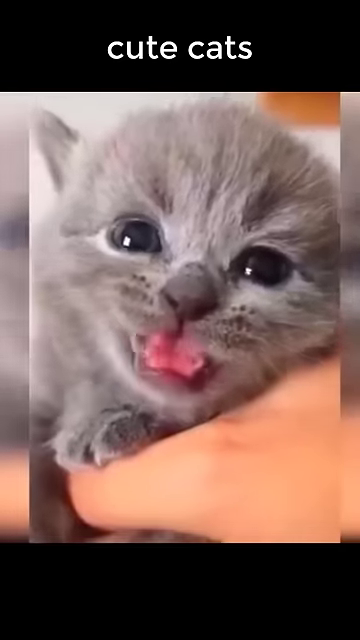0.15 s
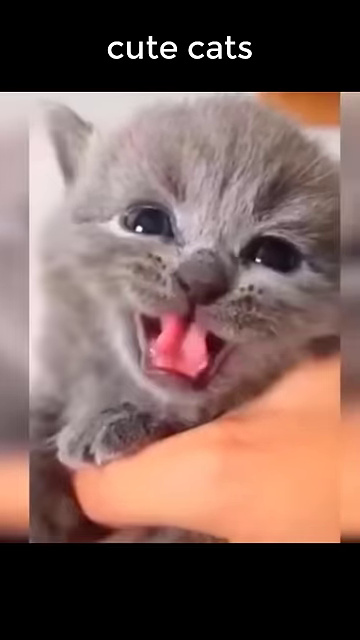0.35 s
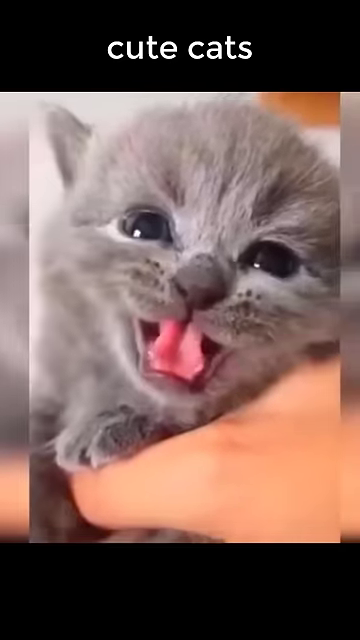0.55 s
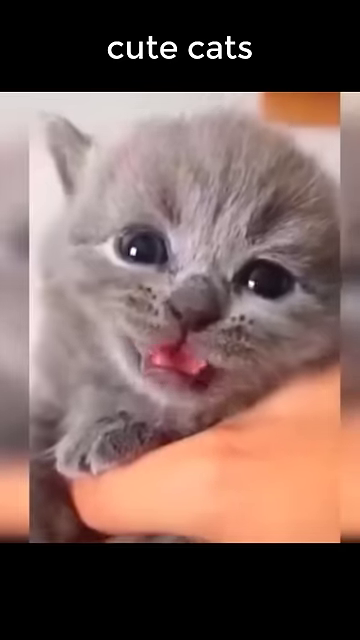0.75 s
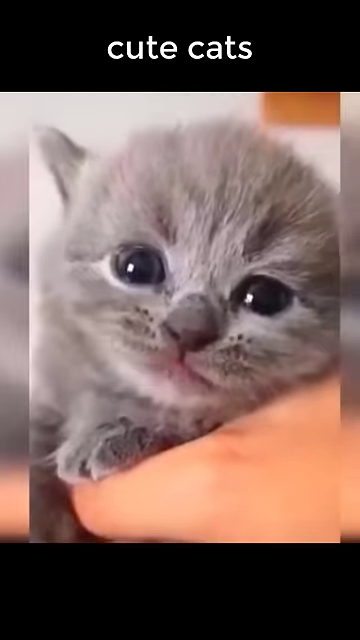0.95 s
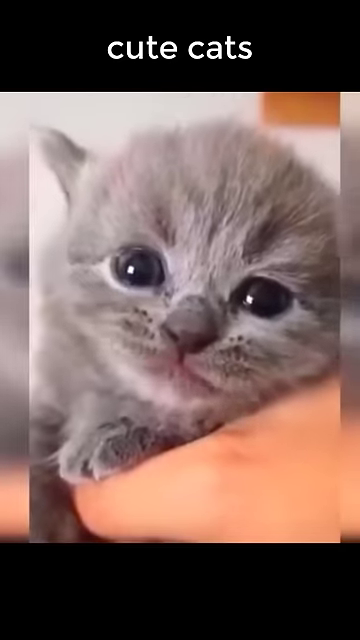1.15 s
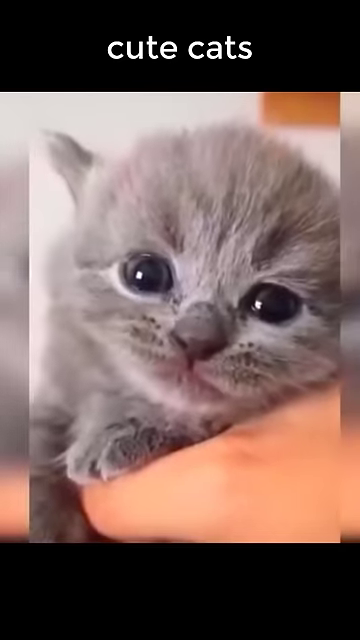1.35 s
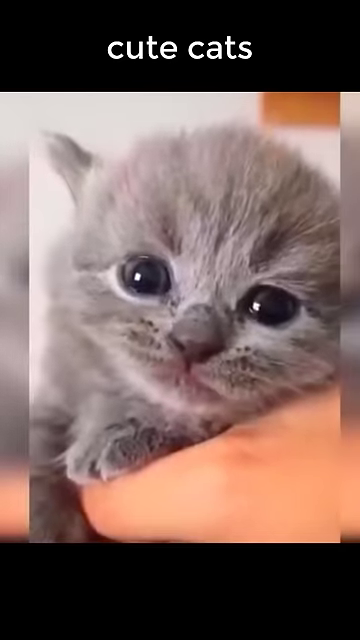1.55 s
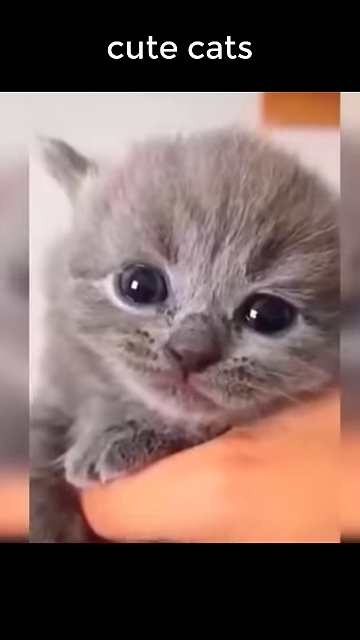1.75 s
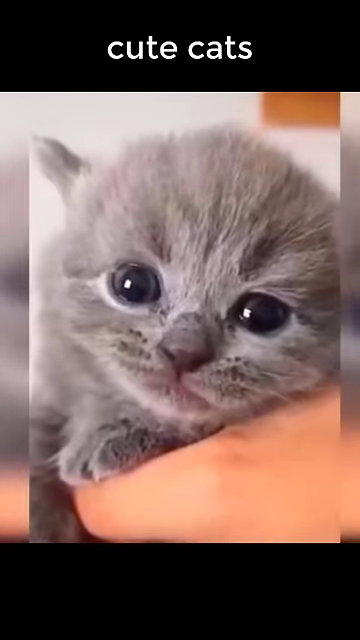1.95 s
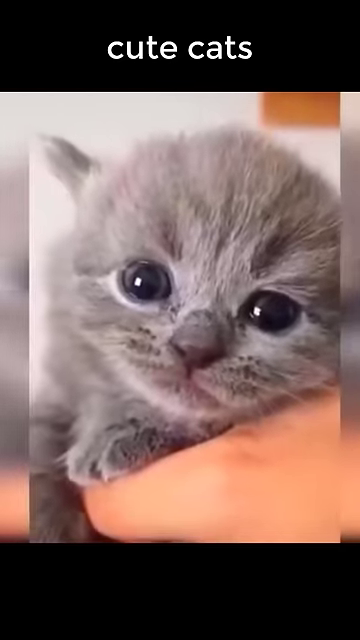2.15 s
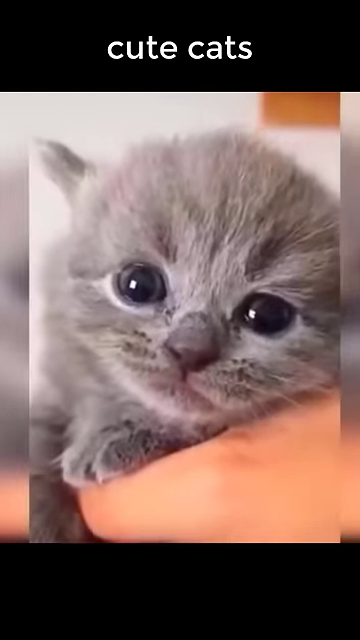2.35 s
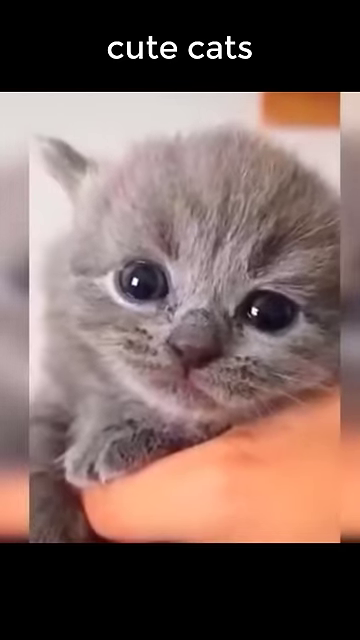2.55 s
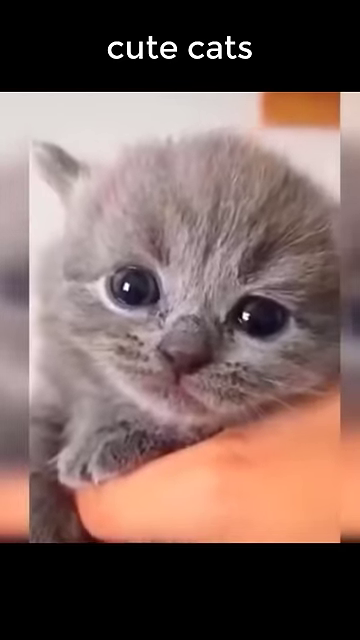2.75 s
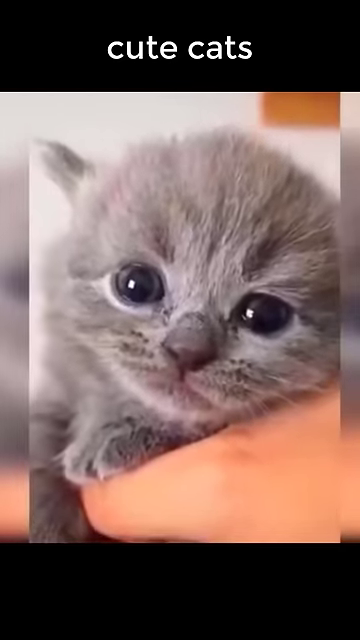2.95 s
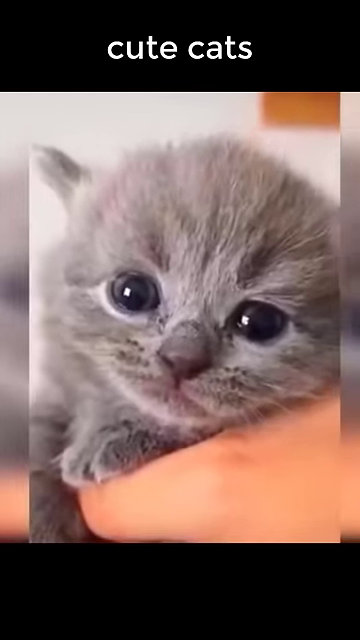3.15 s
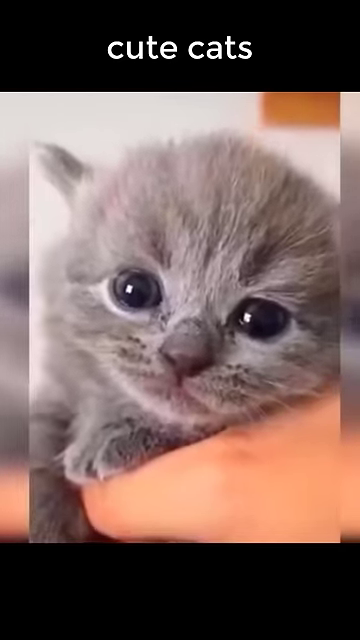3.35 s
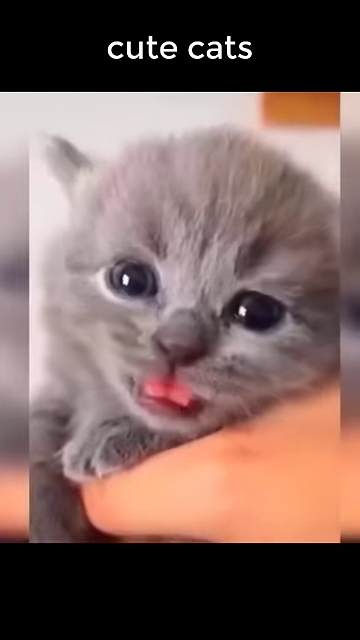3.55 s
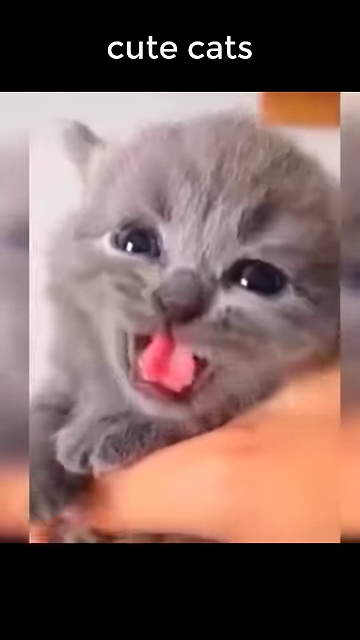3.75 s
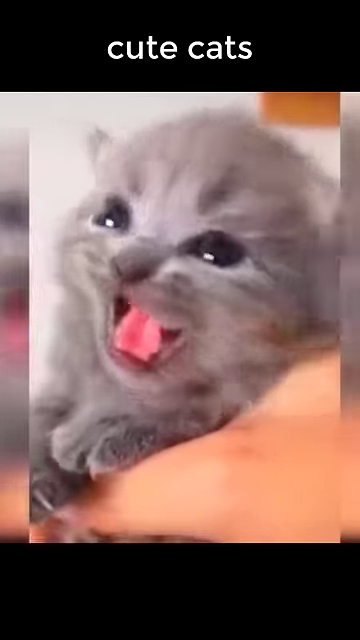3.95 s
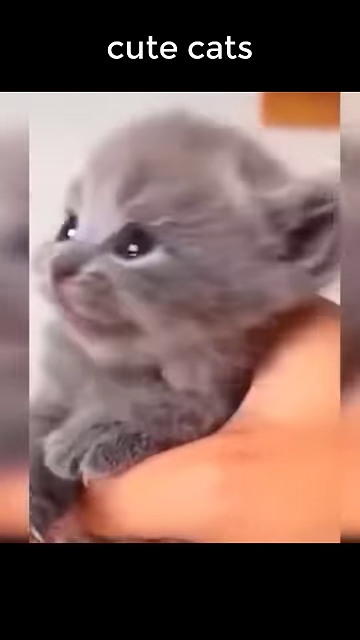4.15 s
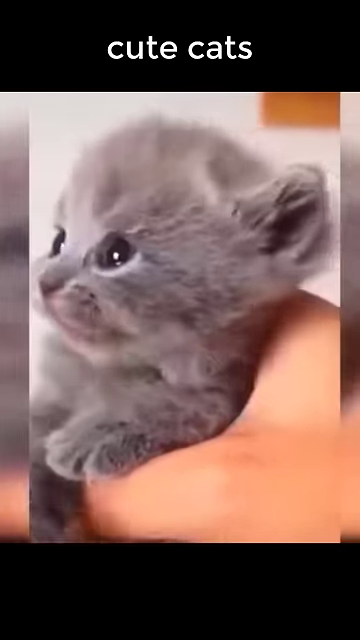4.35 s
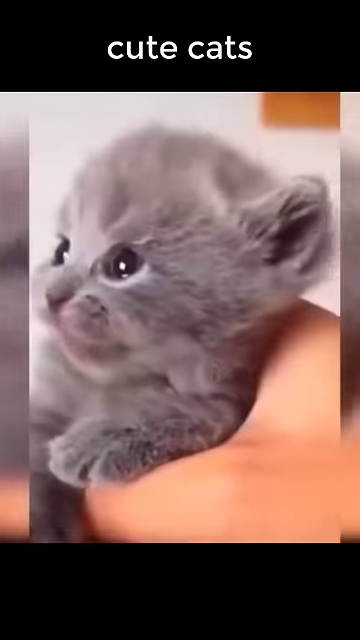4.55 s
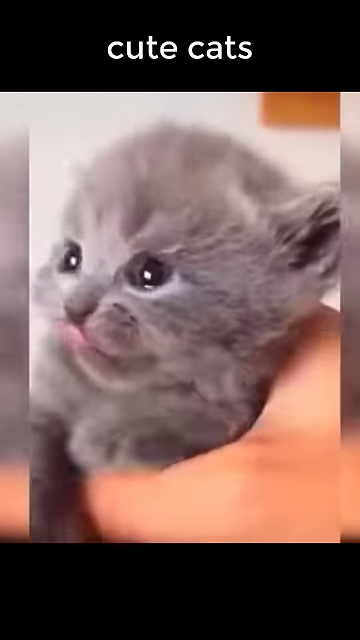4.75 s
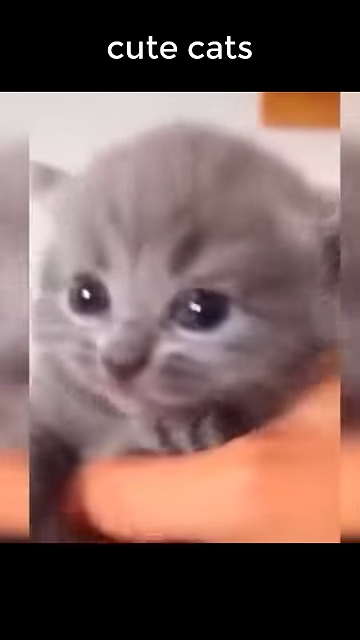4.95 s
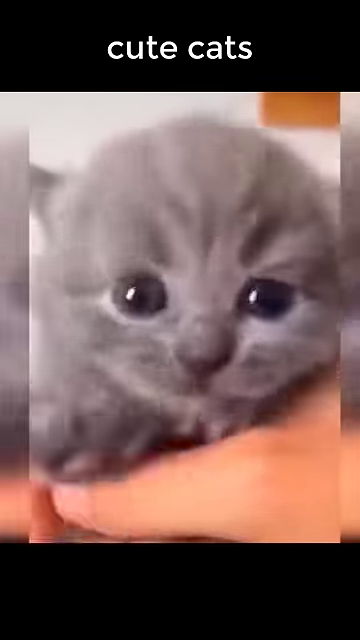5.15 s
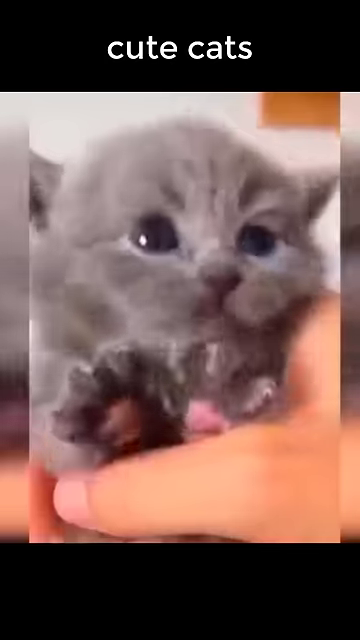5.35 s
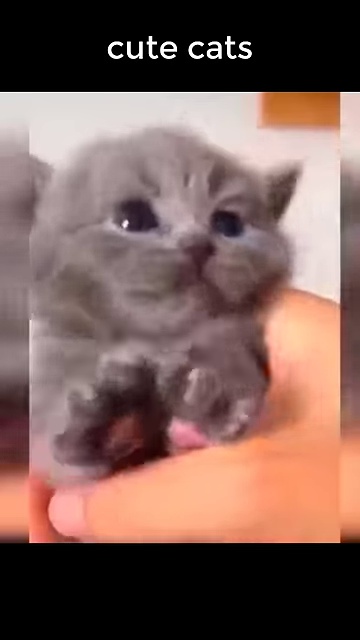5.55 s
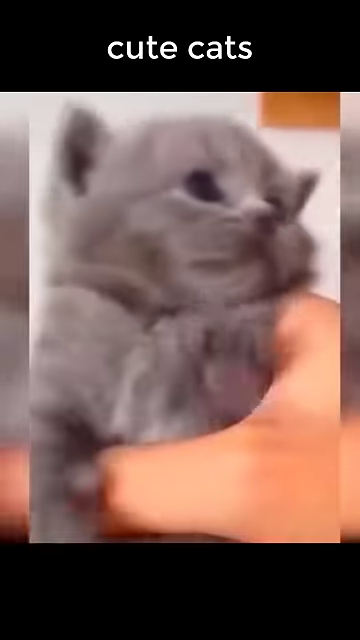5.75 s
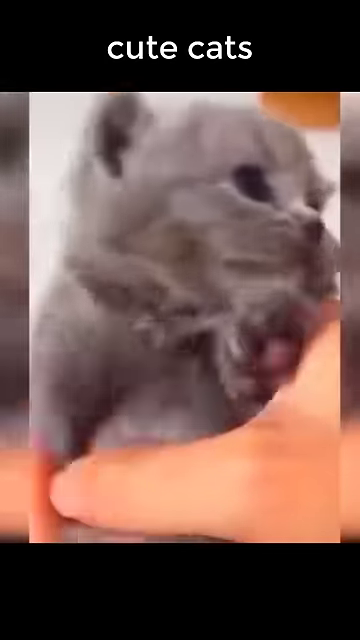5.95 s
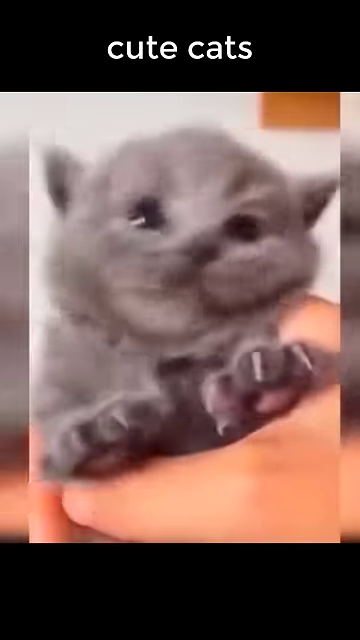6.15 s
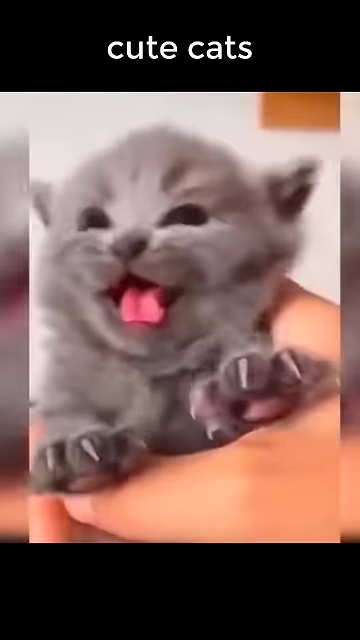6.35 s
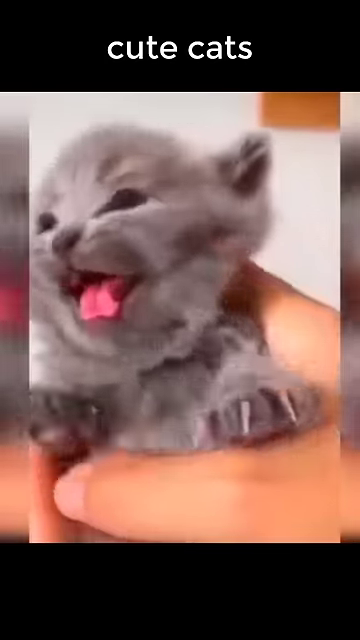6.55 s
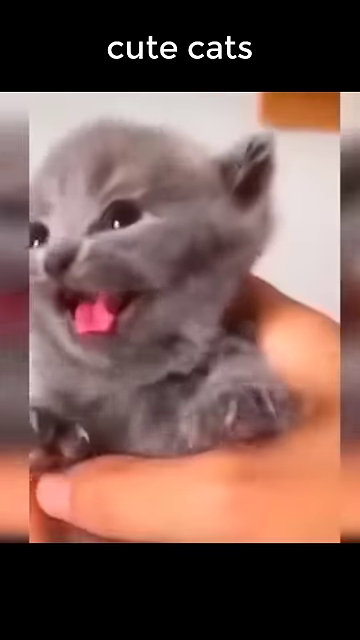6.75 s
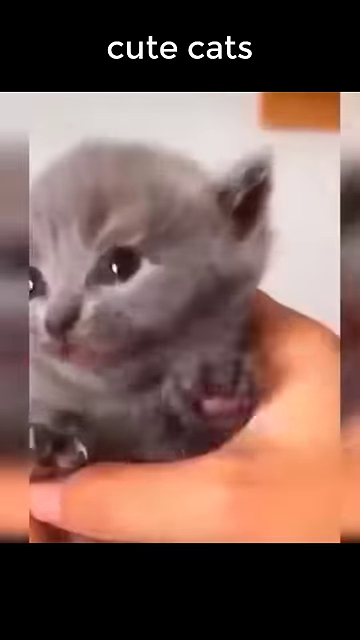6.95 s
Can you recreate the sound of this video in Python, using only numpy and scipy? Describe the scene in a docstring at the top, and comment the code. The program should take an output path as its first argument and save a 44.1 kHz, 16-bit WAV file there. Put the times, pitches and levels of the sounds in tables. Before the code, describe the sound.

A tiny kitten held in a hand cries in a small clear squeak, then stays quiet for nearly three seconds with only a brief breathy puff and soft thumps. A second, shorter mew follows, then scratchy handling of fur and claws, and a third, brighter mew comes at the end. The pickup is close and mono, indoors, with a slight room tail and quiet steady hum.

```python
"""A quiet room, where a tiny kitten held in a hand close to the microphone mews three times.
Each thin cry is a stack of harmonics shaped by a mouth that opens and closes; its pitch rises and falls.
Around the cries, filtered noise and short pings make the fine scratchy rustle of handling.
There are also small soft bumps, an airy puff with a faint one after it, and steady tones:
an appliance humming in the background."""
import sys
import numpy as np
from scipy import signal
from scipy.fft import rfft, irfft, next_fast_len
from scipy.io import wavfile
from scipy.ndimage import uniform_filter1d, map_coordinates

SR = 44100
rng = np.random.default_rng(int(sys.argv[2]) if len(sys.argv) > 2 else 0)


def pcm_store(signal):
    """Save signal as 16-bit PCM."""
    levels = np.round(np.clip(np.atleast_2d(signal), -1, 1) * 32767)
    wavfile.write(sys.argv[1], SR, levels.astype(np.int16).T)


N = 308460
TIME = np.arange(N) / SR  # seconds


def amp(db):
    """Turn decibels into a gain."""
    return 10 ** (np.asarray(db) / 20)


def unit(x):
    """Scale a sound to an rms level of 1."""
    return x / np.sqrt(np.mean(x ** 2) + 1e-20)


def along(points, hz):
    """Read a curve of (frequency, value) points at any frequency, on a log axis."""
    point_hz, values = np.transpose(points)
    return np.interp(np.log(hz + 1), np.log(point_hz + 1), values)


def wobble(rate):
    """A smooth random curve with this many random points a second."""
    knots = rng.standard_normal(int(N * rate / SR) + 4)
    return map_coordinates(knots, [TIME * rate])


def filtered(x, response):
    """Multiply the spectrum of x by a response that depends on frequency."""
    size = next_fast_len(N + SR // 2)  # spare room so the end does not wrap round to the start
    spectrum = rfft(x, size) * response(np.fft.rfftfreq(size, 1 / SR))
    return irfft(spectrum, size)[..., :N]


def noise(colour):
    """Random hiss of rms 1, coloured by a (f/Hz, level/dB) curve."""
    return unit(filtered(rng.standard_normal(N), lambda hz: amp(along(colour, hz))))


def band(hz, centre, width):
    """Response of one resonance, equal to 1 at its centre."""
    return 1j * hz * width / (centre ** 2 - hz ** 2 + 1j * hz * width)


def swell(s, half):
    """A bell-shaped swell around time s, down to 1/e after the half length."""
    return np.exp(-((TIME - s) / half) ** 2)


def gesture(start, length, rise, fall_db_per_s):
    """A loudness curve that rises, holds until its length is over and dies away."""
    age = TIME - start
    fall = amp(-fall_db_per_s * np.maximum(age - length, 0))
    return np.clip(age / rise, 0, 1) * fall


# colour of the room noise: (f/Hz, relative level/dB)
AIR_COLOUR = [(15, -55), (25, -19.5), (75, -2), (108, -8.5), (164, -0.5), (257, -8), (325, -3.5),
              (411, -11), (520, -13), (563, -11.5), (1000, -16), (1330, -20), (3250, -20.5), (6580, -32),
              (13000, -48)]
# tones of the appliance: (f/Hz, relative level/dB)
HUM_TONES = [(53.8, -70), (86.1, -63.5), (129.2, -73), (172.3, -66), (328.4, -69.5), (387.6, -67),
             (522.2, -70.5), (985.1, -71), (1642, -77.5)]


def background(air_db=-57.5, hum_db=-1, drift_rad=0.57, sway_db=2):
    """Room noise, plus appliance tones whose loudness and phase wander slightly."""
    hum = np.zeros(N)
    for hz, db in HUM_TONES:
        loudness = amp(db + sway_db * wobble(5.14)) * np.sqrt(2)  # sqrt(2) turns rms into peak
        hum += loudness * np.sin(2 * np.pi * hz * TIME + drift_rad * wobble(8))
    return amp(air_db) * noise(AIR_COLOUR) + amp(hum_db) * hum


# how long the room rings: (f/Hz, t/s to die by 60 dB)
ROOM_DECAY = [(300, 1), (2300, 0.77), (5000, 0.36), (12000, 0.026)]


def room(x):
    """Echoes blur into a noisy tail in which each frequency dies at its own speed."""
    hz, t, cells = signal.stft(rng.standard_normal(SR // 2), SR, nperseg=256)
    decay = amp(-60 * t / along(ROOM_DECAY, hz)[:, None])
    tail = signal.istft(cells * decay, SR, nperseg=256)[1]
    return signal.fftconvolve(x, tail / np.linalg.norm(tail))[:N]


# small soft noises of moving about: (t/s, half length/s, centre f/Hz, level/dB)
SOFT_STIRS = [(0.194, 0.044, 217, -53), (0.357, 0.0063, 3530, -40.5), (1.557, 0.011, 846, -58),
              (2.07, 0.063, 166, -52), (2.194, .08, 55, -55.5), (2.315, .04, 4220, -61.5),
              (5.371, 0.0076, 2950, -53.5), (5.97, 0.02, 1250, -56.5), (6.237, 0.088, 139, -57.5),
              (6.443, 0.03, 192, -50), (6.715, 0.055, 251, -52)]


def stirs(width_at_1khz_hz=560):
    """Soft bumps and brushes, each a short swell of noise in one band."""
    out = np.zeros(N)
    for s, half, centre, db in SOFT_STIRS:
        width = width_at_1khz_hz * np.sqrt(centre / 1000)
        # the resonance is applied twice, which narrows the band
        brush = unit(filtered(rng.standard_normal(N), lambda hz: band(hz, centre, width) ** 2))
        out += amp(db) * swell(s, half) * brush
    return out


# airy puffs: (start t/s, level/dB)
PUFF_TIMES = [(1.70, -44.5), (2.0, -70)]
# colour of their hiss: (f/Hz, relative level/dB)
PUFF_HISS = [(1060, -45), (1800, -8.5), (2680, -4), (3110, 5), (3760, 0), (4080, 4), (4430, -0.5),
             (6280, 6), (6930, 1), (10400, 3.5), (13000, -1)]


def puff(length_s=0.062, rise_s=0.066, fall_db_per_s=143):
    """A short, bright, airy hiss, and a faint one after it."""
    loudness = sum(amp(db) * gesture(s, length_s, rise_s, fall_db_per_s) for s, db in PUFF_TIMES)
    return loudness * noise(PUFF_HISS)


RING_HZ = 6045  # the high ring shared by rubbing and catches
# strokes of fur and claws against the hand: (start t/s, length/s, relative level/dB)
RUB_STROKES = [(-.02, 0.19, -59.5), (0.12, 0.23, -51), (0.257, 0.063, -38.5), (1.035, .15, -64.5),
               (3.212, 0.4, -68), (3.402, 0.1, -60), (3.648, 0.18, -55.5), (4.495, 0.073, -56.5),
               (4.652, 0.1, -53.5), (4.876, 0.034, -67), (5.178, 0.78, -68), (5.367, 0.24, -53),
               (5.824, .32, -53), (5.913, .05, -49.5), (6.175, .12, -58), (6.279, 0.14, -52.5),
               (6.432, 0.045, -45.5)]
# further resonances above the ring: (f/Hz, width/Hz, relative level/dB)
BODY_RESONANCES = [(6310, 210, -9.5), (7400, 110, -21.5)]
# colour of the crackle, here and in the catches: (f/Hz, relative level/dB)
CRACKLE_COLOUR = [(2000, -18.5), (5200, -6.5), (6300, 9.5), (8000, 8), (9500, -10), (13000, -29.5)]


def rubbing(rub_db=-1.0, crackle_db=-6, uneven_db=1.74):
    """Uneven strokes: grainy friction excites a narrow high ring, two further resonances above it and a
    crackle."""
    ring_width_hz, grain_db, spike_db = 110, 2.8, 3.8
    rise_s, fall_db_per_s = 0.021, 139
    strokes = [amp(db) * gesture(s, length, rise_s, fall_db_per_s) for s, length, db in RUB_STROKES]
    pressure = np.max(strokes, axis=0)  # the strongest stroke wins at each moment

    def body(hz):
        broad = sum(amp(db) * band(hz, centre, width) for centre, width, db in BODY_RESONANCES)
        below_ring = np.minimum(hz / RING_HZ, 1) ** 8  # thins out what lies below the ring
        return (band(hz, RING_HZ, ring_width_hz) + broad) * below_ring

    grains = rng.standard_normal(N) * amp(grain_db * wobble(150))
    ring = unit(filtered(grains, body))
    crackle = unit(noise(CRACKLE_COLOUR) * amp(spike_db * wobble(400)))
    unevenness = amp(rub_db + uneven_db * wobble(25))
    return unevenness * pressure * (ring + amp(crackle_db) * crackle)


# the loudest catches in the rubbing: (t/s, relative ring level/dB, relative crackle level/dB)
RUB_CATCHES = [(0.165, -40, -44), (0.265, -36, -52), (0.2799, -24.5, -41), (0.3206, -38, -35),
               (0.3333, -37, -47), (3.672, -47, -57), (3.7653, -45, -61), (4.6941, -44, -64),
               (4.7453, -44, -46), (5.3855, -41.5, -36.5), (5.5512, -38, -47), (5.8384, -54, -49.5),
               (5.901, -38.5, -47), (5.995, -38.5, -53), (6.0696, -41, -43.5), (6.2992, -41.5, -41)]


def catches(ring_db=-2, crackle_db=-2, rise_s=0.00091, ring_life_s=0.0066, crackle_life_s=0.005,
            scatter_hz=30):
    """A sudden slip pings the high ring and throws off a short crackle."""
    ring, force = np.zeros(N), np.zeros(N)
    for s, ping_db, slip_db in RUB_CATCHES:
        age = np.maximum(TIME - s, 0)
        onset = 1 - np.exp(-age / rise_s)
        ping = np.sin(2 * np.pi * rng.normal(RING_HZ, scatter_hz) * age)
        ring += amp(ping_db) * onset * np.exp(-age / ring_life_s) * ping
        force += amp(slip_db) * onset * np.exp(-age / crackle_life_s)
    crackle = force * noise(CRACKLE_COLOUR)
    return 2 * (amp(ring_db) * ring + amp(crackle_db) * crackle)


# fixed colour of the voice: (f/Hz, relative level/dB)
THROAT_COLOUR = [(800, 0), (1400, -.1), (2200, -8), (3000, -7.4), (4000, -3.9), (5300, -2.6), (5750, -3.9),
                 (6100, 5.2), (6700, 4.8), (8000, 10.7), (10000, 17), (13000, 21)]
# colour of the breath, here and in the husky moments: (f/Hz, relative level/dB)
BREATH_COLOUR = [(500, -14), (1000, -3.5), (2300, -10.5), (3500, 2.5), (4700, -13), (6300, 1), (7800, -7.5),
                 (9000, -22.5), (13000, -8.5)]
# a rasp at half the pitch, where the folds beat unevenly: (t/s, half length/s, level/dB)
RASP_MOMENTS = [(0.883, 0.013, -39), (0.929, 0.022, -41.5)]
WIDE_HZ = 4120  # mouth resonance with the jaw wide open
OPEN_S, FADE_S, STOP_S = 0.068, 0.084, 0.026  # the jaw opens; the air runs out; the folds stop
POP_S = 0.0018  # the first cycles overshoot as the folds burst open
GLIDE_S = 0.04  # the pitch curve is smoothed over this time
STRAIN_DB = 43.5  # the top harmonics lose this much for each octave that the pitch sags
UPPER_RISE_HZ = 2970  # the upper resonance climbs this much for each octave that the pitch sags
LEAK_DB = -40  # leaking air, relative to the fundamental's level setting


def mew(cry, arch, mouth_width_hz=355, upper_width_hz=1900, flutter_db=4.0, rasp_wander_rad=1.5,
        low_count=5):
    """Harmonics of the vocal folds pass two resonances; the jaw opens quickly, then closes steadily."""
    (start, end, loud_db, gape_s, first_hz, last_hz, upper_hz,
     bright_db, dull_db, pop_db, fade_db) = cry
    on = (TIME >= start) & (TIME <= end)
    t = TIME[on]

    # the muscles round off every turn of the pitch
    pitch = uniform_filter1d(np.interp(t, *np.transpose(arch)), size=round(GLIDE_S * SR))
    sag = np.log2(pitch.max() / pitch)  # octaves below the highest pitch

    # the moving jaw shifts the resonances and the brightness
    still_shut = np.exp(-(t - start) / OPEN_S)
    closing = np.clip((t - start - gape_s) / (end - start - gape_s), 0, 1)
    mouth = WIDE_HZ + (first_hz - WIDE_HZ) * still_shut + (last_hz - WIDE_HZ) * closing
    upper = upper_hz + UPPER_RISE_HZ * sag
    bright = bright_db - dull_db * still_shut  # dB per octave
    db = loud_db - fade_db * np.exp((t - end) / FADE_S) + pop_db * np.exp((start - t) / POP_S)

    # taut folds give a pure tone; slack folds at low pitch vibrate less steadily
    slack = np.minimum((pitch.max() / pitch) ** 5, 2.5)
    waver = .0016 * wobble(45)[on] + .001 * wobble(150)[on] + .0007 * slack * wobble(600)[on]
    phase = 2 * np.pi * np.cumsum(pitch * (1 + slack * waver)) / SR

    k = np.arange(1, 13)[:, None]  # harmonic numbers
    hz = k * pitch

    def formant(centre, width):
        return 1 / (1 - (hz / centre) ** 2 + 1j * hz * width / centre ** 2)

    gain = formant(mouth, mouth_width_hz) * formant(upper, upper_width_hz)
    gain = gain * amp(along(THROAT_COLOUR, hz) + bright * np.log2(k))
    # the top harmonics need taut folds, and flutter more than the low ones
    gain = gain * amp(-STRAIN_DB * sag * (k > low_count))
    flutter = np.array([wobble(25)[on] + .5 * wobble(250)[on] for _ in k]) * (k / len(k)) ** 1.15
    # levels are set relative to the fundamental
    gain = gain / np.abs(gain[0]) * amp(db + flutter_db * slack * flutter)
    voice = np.sum(gain * np.exp(1j * k * phase), axis=0).real

    # a little air leaks past the folds
    voice = voice + amp(db + LEAK_DB) * noise(BREATH_COLOUR)[on]
    rasp = sum(amp(rasp_db) * swell(s, half) for s, half, rasp_db in RASP_MOMENTS)[on]
    voice = voice + rasp * np.cos(phase / 2 + rasp_wander_rad * wobble(200)[on])

    # the folds spring into motion within one cycle and fade more gently
    attack = np.minimum(phase / np.pi, 1)
    release = np.minimum((end - t) / STOP_S, 1)
    out = np.zeros(N)
    out[on] = voice * attack * release
    return out


# the cries: (start t/s, end t/s, fundamental level/dB, t/s until the jaw starts to close,
# mouth resonance at the start f/Hz, mouth resonance at the end f/Hz, upper resonance f/Hz,
# brightness/dB per octave, dullness at the start/dB per octave, opening pop/dB, final fade/dB)
CRY_SETTINGS = [(0.367, 1.047, -37, 0.16, 3690, 1770, 5280, -1.22, 1.8, 1, 4),
                (3.793, 4.385, -35, 0.13, 3640, 1860, 5180, -1, 3, 1.5, 15),
                (6.436, 7.047, -38, .14, 2580, 2930, 5460, -0.5, 9.5, 7, 4)]
# the arch of each cry, before smoothing: one list per cry of (t/s, pitch f/Hz)
PITCH_ARCHES = [
    [(0.365, 1080), (0.392, 1164), (0.475, 1241), (0.538, 1322), (0.705, 1305), (0.774, 1244),
     (0.874, 1157), (0.93, 1147), (1.03, 1032)],
    [(3.793, 1054), (3.813, 1176), (3.908, 1353), (3.989, 1375), (4.04, 1364), (4.199, 1274), (4.322, 1102),
     (4.37, 714)],
    [(6.44, 1110), (6.453, 1223), (6.539, 1333), (6.694, 1471), (6.785, 1429), (6.865, 1410), (6.943, 1361),
     (6.99, 1262)],
]
# moments when the voice turns husky: (t/s, half length/s, noise level/dB)
HUSKY_MOMENTS = [(.385, .025, -57), (.893, .026, -50), (.99, .05, -59), (4.15, .09, -61), (4.355, .04, -56),
                 (6.8, .1, -61), (6.98, .025, -55)]


def kitten(low_edge_hz=700):
    """Three cries, with breathy noise in their husky moments."""
    cries = sum(mew(cry, arch) for cry, arch in zip(CRY_SETTINGS, PITCH_ARCHES))
    # so small a mouth radiates almost no bass
    bass_cut = signal.butter(4, low_edge_hz, "high", fs=SR, output="sos")
    voice = signal.sosfilt(bass_cut, cries)
    husk = sum(amp(db) * swell(s, half) for s, half, db in HUSKY_MOMENTS)
    return voice + husk * noise(BREATH_COLOUR)


def scene(room_db=-26.5):
    """Everything nearby gets a faint room tail; both channels carry the same sound."""
    near = kitten() + rubbing() + catches() + stirs() + puff()
    mono = near + amp(room_db) * room(near) + background()
    return np.array([mono, mono])


def record(dry, low_cut_hz=38, top_hz=13150):
    """The microphone loses the deepest bass and keeps nothing above its band limit."""
    def microphone(hz):
        bass_loss = (hz / low_cut_hz) ** 2 / np.sqrt(1 + (hz / low_cut_hz) ** 4)
        return bass_loss * (hz < top_hz)

    return filtered(dry, microphone)


dry = scene()
out = record(dry)
pcm_store(out)
```